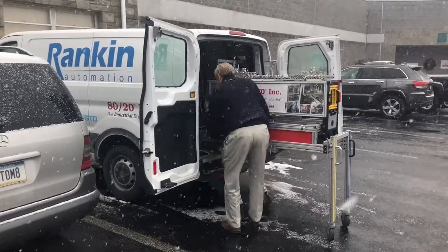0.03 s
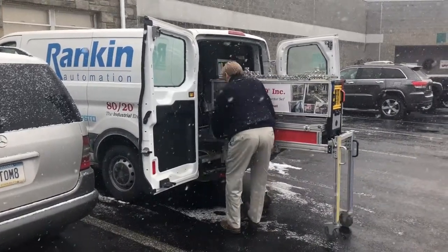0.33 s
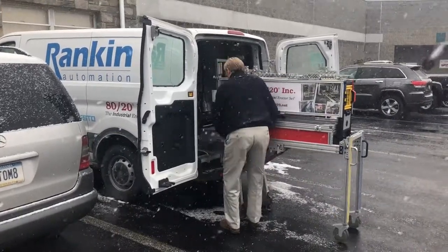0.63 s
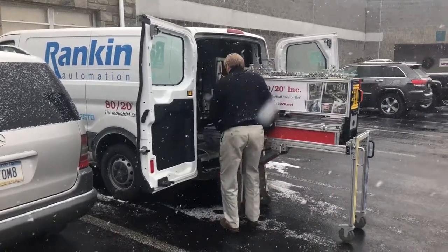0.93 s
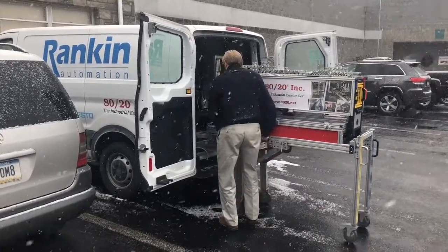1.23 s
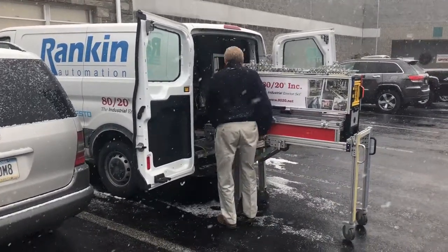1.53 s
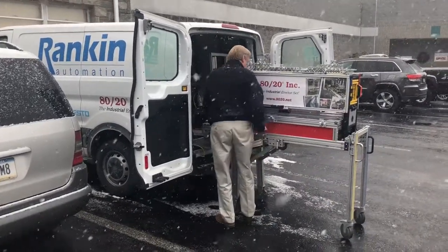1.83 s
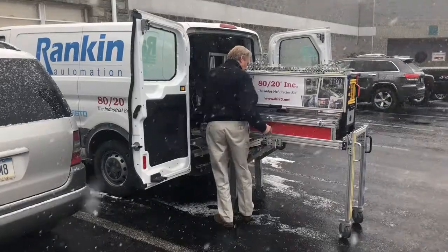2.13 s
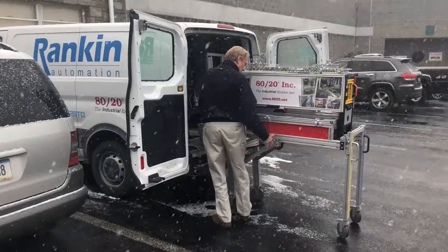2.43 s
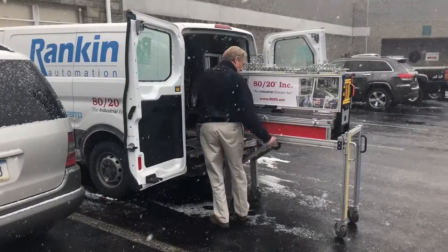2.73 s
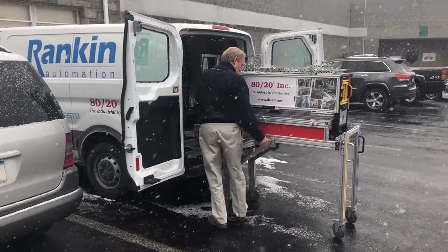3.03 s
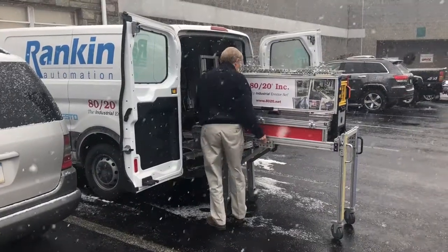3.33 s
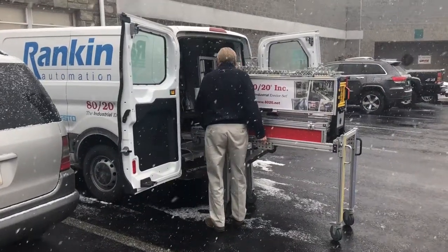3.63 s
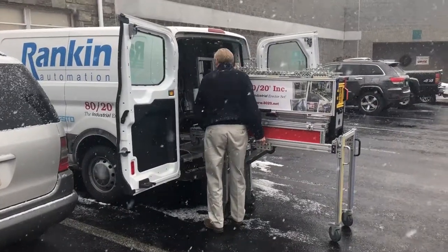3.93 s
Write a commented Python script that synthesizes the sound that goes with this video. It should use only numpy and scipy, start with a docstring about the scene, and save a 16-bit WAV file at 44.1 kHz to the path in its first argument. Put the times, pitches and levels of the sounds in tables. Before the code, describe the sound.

A metal cart slides out of a van, scraping with a hiss and a rising squeal from about 0.3 to 0.8 seconds, its wheels crackling faintly. The frame clanks and rattles near 1.2, 1.4 and 1.8 seconds, and a catch snaps shut around 2.5. Throughout, a nearby engine hums, settling to a lower idle by 2 seconds, with soft wind and distant traffic in the parking lot.

```python
"""A metal-frame cart is drawn out of a van in a parking lot. Sliding friction makes its runner hiss and
stick-slip makes it squeal; the wheels crackle faintly, impacts on the sill ring the modes of the frame,
and a catch snaps shut. Nearby an engine sounds harmonics of its cycle rate and settles to a lower idle.
Wind and distant traffic fill the lot with broadband noise, and a building wall faintly reflects the cart."""
import sys
import numpy as np
from scipy import signal
from scipy.fft import rfft, irfft, next_fast_len
from scipy.io import wavfile
from scipy.ndimage import map_coordinates

SR = 44100
rng = np.random.default_rng(int(sys.argv[2]) if len(sys.argv) > 2 else 0)


def transcribe(signal):
    """Save signal, clipped to [-1, 1], as a 16-bit WAV file at the path in sys.argv[1]."""
    frames = np.atleast_2d(signal).T
    limited = np.clip(frames, -1, 1)
    pcm = np.round(limited * 32767).astype(np.int16)
    wavfile.write(sys.argv[1], SR, pcm)


N = 176400

# wind and traffic: spectrum (frequency [Hz], relative level [dB])
LOT_SPECTRUM = [(180, -12), (300, -2), (411, -6), (553, -6), (663, -6), (849, -8), (1140, -10.5),
                (3020, -28), (5500, -35), (9000, -44.5), (15500, -47)]
# wind and traffic: envelope (time [s], level [dB])
LOT_ENVELOPE = [(0.0, -53), (0.14, -57.5), (2.77, -54), (4.0, -56)]
# low drone: envelope (time [s], level [dB])
DRONE_ENVELOPE = [(0, -88), (1.7, -58.5), (2.5, -68), (3.2, -51.5), (4, -53.5)]
# engine speed (time [s], cycle rate [Hz])
ENGINE_SPEED = [(0, 14.93), (.7, 14.87), (1.2, 14.65), (1.7, 13.75), (2.1, 13.3), (3, 13.1), (4, 12.93)]
# exhaust harmonics at fast idle (order [multiple of cycle rate], relative level [dB])
FAST_IDLE_ORDERS = [(1, -44), (3, -22), (4, -25), (5, -11.5), (6, -9), (7, -0.5), (8, 2), (10, -32),
                    (11, -15.5), (13, -4), (14, -21.5), (15, -21), (16, -16.5)]
# exhaust harmonics at slow idle (order [multiple of cycle rate], relative level [dB])
SLOW_IDLE_ORDERS = [(3, -33), (4, -13.5), (5, -6.5), (6, -36), (7, 2), (8, 1.5), (9, -13.5), (10, -16.5),
                    (12, -11), (13, -15), (14, -6), (15, -21), (16, -1), (17, -17), (18, -24), (19, -34),
                    (21, -18.5), (24, -18.5)]
# engine rumble: spectrum (frequency [Hz], relative level [dB])
RUMBLE_SPECTRUM = [(20, -36), (40, -31), (62, 8), (100, 8), (135, 5), (170, 10.5), (225, 7.5), (280, -11.5),
                   (400, -44), (800, -49)]
# reverberation of van and building (frequency [Hz], T60 [s])
REVERB_T60 = [(200, 0.57), (2000, 0.51), (10000, 0.16)]
# rolling wheels: envelope (time [s], level [dB])
ROLL_ENVELOPE = [(0, -58), (.2, -60), (.8, -60.5), (1.1, -64.5), (1.4, -62.5), (2.1, -69.5), (2.8, -90)]
# rolling wheels: spectrum (frequency [Hz], relative level [dB])
ROLL_SPECTRUM = [(500, 10), (1600, 6), (3000, -4.5), (5500, -5.5), (9000, -16), (15500, -13)]
# rubs on the van floor (peak time [s], level [dB], half length [s], centre [Hz], width [octaves])
FLOOR_SCUFFS = [(0.013, -60.5, 0.016, 2500, 1.5), (0.099, -54, 0.012, 2500, 1.25),
                (0.184, -51.5, 0.013, 1410, 1.58), (0.491, -46.5, 0.011, 1570, 0.97),
                (0.486, -48.5, 0.0081, 3800, 0.13), (0.562, -50, 0.0057, 1710, 1.5),
                (1.543, -62, .014, 1940, 0.14), (1.767, -64, 0.034, 1950, 0.24),
                (2.607, -61.5, 0.047, 1500, 1.1), (3.903, -70, 0.017, 4870, 0.88)]
# squeaks of the chattering runner (peak time [s], level [dB], half length [s], pitch [Hz])
RUNNER_SQUEAKS = [(0.519, -58.5, 0.0068, 2200), (.52, -64, .008, 7740), (0.56, -55.5, 0.0052, 1880),
                  (0.541, -61, 0.0093, 4200), (.59, -64, 0.012, 4020), (.61, -59, .008, 5950),
                  (.612, -58, 0.0082, 7660), (.635, -68, 0.0067, 2400), (0.667, -58, 0.013, 10600)]
# clicks of fittings and catch (time [s], level [dB], centre [Hz], width [octaves], T60 [s])
FITTING_CLICKS = [(0.2378, -47, 6000, 3.2, 0.056), (0.556, -53, 8200, .07, 0.05),
                  (.703, -55, 14000, .2, 0.024), (.872, -63.5, 2500, 1.8, 0.049),
                  (.989, -65.5, 5930, 1.8, 0.15), (1.042, -62, 2980, 1.3, 0.067),
                  (1.063, -47, 790, 0.65, 0.065), (1.064, -59, 5500, 0.29, 0.037),
                  (1.226, -47, 3770, 0.34, 0.016), (1.304, -61, 4970, 1.1, 0.1),
                  (1.369, -62.5, 6000, 1.27, 0.03), (1.556, -55.5, 8300, 1.4, 0.057),
                  (1.658, -61, 7040, 2.9, 0.033), (1.862, -64, 7950, 1.3, 0.06),
                  (1.96, -61, 3860, 0.66, .06), (2.069, -64.5, 12500, 0.25, .04),
                  (2.5364, -38, 8000, 1.6, 0.0073), (2.538, -49, 4000, 0.85, 0.051),
                  (2.5403, -39, 380, 1.1, 0.089), (2.5413, -33, 1940, 0.27, 0.026),
                  (2.575, -52.5, 3500, 0.46, 0.036), (2.636, -57, 10000, 0.97, 0.072),
                  (2.6618, -47, 4400, 0.53, 0.041), (2.667, -46.5, 2060, 0.28, 0.034),
                  (2.9997, -58.5, 4900, 0.58, 0.026)]
# sliding runner: envelope (time [s], level [dB])
SLIDE_ENVELOPE = [(.225, -92), (.25, -63), (.32, -60), (.375, -54.5), (.41, -65), (.45, -64), (.48, -54),
                  (.56, -58.5), (.63, -54.5), (.68, -69), (.75, -64), (.82, -96), (.9, -110)]
# friction hiss: spectrum (frequency [Hz], relative level [dB])
HISS_SPECTRUM = [(600, -24), (1900, -4), (2800, -3), (4500, -0.5), (6500, 0), (8500, 3), (11000, 2),
                 (12700, 4), (14500, -6), (15800, 2)]
# resonances of the runner (frequency [Hz], bandwidth [Hz], relative level [dB])
RUNNER_MODES = [(5304, 42, 16), (7000, 60, 1), (7530, 70, 13), (7940, 60, 1), (8880, 130, 9), (9300, 70, 6),
                (10020, 120, 7), (10600, 110, 5), (12600, 200, 10), (14200, 130, 12)]
# stick-slip oscillation (time [s], pitch [Hz], level [dB], roughness [0-1])
SQUEAL_PATH = [(.36, 1055, -69, 0.56), (.405, 1080, -54, 0.06), (.43, 1080, -56.5, 0),
               (.455, 1078, -57, 0.06), (.475, 1037, -69, 1), (.51, 1090, -76, 0.7), (.53, 1335, -62, 0.8),
               (.59, 1328, -70, 0.66), (.602, 1503, -73, 0.44), (.617, 1520, -62, 0.37),
               (.635, 1450, -69, 0.94), (.655, 1509, -56, 0.15), (.668, 1510, -58, 0.19),
               (.68, 1464, -55.5, 0), (.718, 1454, -57.5, .2), (.735, 1480, -59.5, 0.4),
               (.747, 1535, -53.5, 0.54), (.752, 1550, -72, .9), (.76, 1824, -53, 0.25),
               (.78, 1840, -69, 0.1), (.81, 1860, -87, .47)]
# weighting of the squeal's harmonics (frequency [Hz], relative level [dB])
SQUEAL_SPECTRUM = [(1000, -12), (2150, -0.5), (2900, 1), (3300, -17), (4300, -5), (5350, 1), (5900, -5),
                   (6500, -1), (7550, 5), (8600, -0.5), (9000, 4.5), (9700, -7), (10700, -7), (11700, -6),
                   (14000, -6), (15500, -19)]
# modes of the frame (frequency [Hz], relative level [dB], T60 [s])
FRAME_MODES = [(1227, -10, .13), (1425, -11, .18), (1606, -10, .13), (1680, -5.5, .125), (1965, -5.5, .105),
               (2070, -1.5, .08), (2422, -10, .09), (2985, -7, .105), (3240, -13.5, .08), (4000, -16, .08),
               (4920, -15, .08), (6150, -15, .09), (7300, -14, .07), (8845, -17, .045), (11170, -16, .05)]
# impacts on the sill
# (time [s], ring level [dB], clatter level [dB], main mode [Hz], its lift [dB], rebound gain [dB])
SILL_IMPACTS = [(1.173, -46, -39.5, 2070, 5, -3), (1.204, -48, -44, 1680, 5, -4),
                (1.2244, -43, -34, 1227, 16.5, -17), (1.239, -66, -50, 1227, 3, -10),
                (1.2493, -67, -45.5, 1227, 4, -18), (1.4426, -38.5, -36, 1654, 4.5, -2.5),
                (1.7908, -40, -38.5, 2950, 0.5, -10), (1.805, -46.5, -63, 2985, 2.5, -2)]
# clatter: initial spectrum (frequency [Hz], relative level [dB])
CLATTER_SPECTRUM = [(150, -33), (400, 0), (700, 0), (1200, 2), (2000, 4.5), (2800, -6.5), (5000, -7),
                    (8000, -15), (12000, -14.5), (15500, -18)]
# clatter: decay (frequency [Hz], T60 [s])
CLATTER_DECAY = [(400, 0.13), (2000, 0.079), (5000, 0.085), (14000, 0.064)]

TOP_HZ = 15950


def amp(db):
    """Amplitude ratio of a level in decibels."""
    return 10 ** (np.asarray(db) / 20)


def unit(x):
    """Normalisation to rms 1."""
    return x / np.sqrt(np.mean(x ** 2) + 1e-20)


def along(points, hz):
    """Interpolation of (frequency, value) points on a logarithmic frequency axis."""
    freqs, values = np.transpose(points)
    return np.interp(np.log(hz + 1), np.log(freqs + 1), values)


def curves(rows):
    """Linear interpolation in time: one curve for each column after the first."""
    times, *columns = np.transpose(rows)
    return [np.interp(np.arange(N) / SR, times, column) for column in columns]


def wobble(rate, size=N):
    """Smooth random modulation: a spline through rate Gaussian values a second."""
    return map_coordinates(rng.standard_normal(size // 16), [np.arange(size) * rate / SR], mode="mirror")


def filtered(x, response):
    """Linear filtering: the spectrum of x times a frequency response."""
    padded = next_fast_len(len(x) + 8192)
    return irfft(rfft(x, padded) * response(np.fft.rfftfreq(padded, 1 / SR)), padded)[:len(x)]


def noise(spectrum, size=N):
    """Spectral shaping of white noise, at rms 1."""
    return unit(filtered(rng.standard_normal(size), lambda hz: amp(along(spectrum, hz))))


def band(centre_hz, octaves, size=N):
    """Band-pass noise of rms 1, Gaussian in log frequency."""
    bell = lambda hz: np.exp(-.5 * (np.log2((hz + 1) / centre_hz) / octaves) ** 2)
    return unit(filtered(rng.standard_normal(size), bell))


def damped(x, t60s):
    """Frequency-dependent damping: each band of x decays at its own rate."""
    hz, t, spectra = signal.stft(x, SR, nperseg=128)
    decay = amp(-60 * t / along(t60s, hz)[:, None])
    return signal.istft(spectra * decay, SR, nperseg=128)[1][:len(x)]


def patchy(x, patch_hz=260, patch_s=.05, depth_db=4.2):
    """Random modulation in time and frequency: narrow bands of x flare and fade."""
    spectra = signal.stft(x, SR, nperseg=1024)[2]
    steps = np.array([SR / 1024 / patch_hz, 512 / SR / patch_s])
    knots = np.indices(spectra.shape) * steps[:, None, None]
    field = map_coordinates(rng.standard_normal(spectra.shape), knots, mode="mirror")
    return unit(signal.istft(spectra * amp(depth_db * field), SR, nperseg=1024)[1][:N])


def fade(t, t60):
    """Exponential decay, 60 dB in t60 seconds."""
    return np.exp(-np.log(1000) * t / t60)


def swell(peak_s, half_s):
    """Gaussian envelope with standard deviation half_s."""
    return np.exp(-.5 * ((np.arange(N) / SR - peak_s) / half_s) ** 2)


def add(out, start_s, x):
    """Superposition of x on out from start_s."""
    part = out[max(round(start_s * SR), 0):][:len(x)]
    part += x[:len(part)]


def wind_and_traffic():
    """Broadband ambient noise, strongest at low frequencies, with a slight waver."""
    db, = curves(LOT_ENVELOPE)
    return amp(db + .5 + .4 * wobble(9)) * noise(LOT_SPECTRUM)


def drone():
    """Band-limited noise: a low rush that comes up with the slower idle."""
    db, = curves(DRONE_ENVELOPE)
    return amp(db) * band(centre_hz=197, octaves=.37)


def engine(fast_db=-43.5, slow_db=-47, rumble_db=-48, waver_db=1.2):
    """Periodic exhaust gives harmonics of one shaft speed, over a rumble; their balance follows the speed."""
    speed, = curves(ENGINE_SPEED)
    phase = 2 * np.pi * np.cumsum(speed) / SR
    fast = np.interp(speed, [13.3, 14.65], [0, 1])  # share of the fast idle
    idles = [(FAST_IDLE_ORDERS, fast_db, fast), (SLOW_IDLE_ORDERS, slow_db, 1 - fast)]
    exhaust = np.zeros(N)
    for k in range(1, 25):
        power = .5 if k < 9 else 2  # upper orders dip between the two idles
        gain = sum(share ** power * amp(db + level)
                   for orders, db, share in idles for order, level in orders if round(order) == k)
        gain = gain / (np.sqrt(fast) + np.sqrt(1 - fast))
        waver = amp(waver_db * wobble(6.14))
        exhaust += np.sqrt(2) * gain * waver * np.sin(k * phase + 2 * np.pi * rng.random())
    return exhaust + amp(rumble_db) * noise(RUMBLE_SPECTRUM)


def reflections(x, reverb_s=.03, reverb_db=-18, echo_s=.076, echo_db=-29, echo_cutoff_hz=2500):
    """Reflection: diffuse reverberation from van and building, and one dull echo off the wall."""
    tail = damped(rng.standard_normal(SR // 2), REVERB_T60)
    reverb = signal.fftconvolve(x, tail / np.linalg.norm(tail))
    echo = filtered(x, lambda hz: 1 / (1 + (hz / echo_cutoff_hz) ** 4))
    out = np.zeros(N)
    add(out, reverb_s, amp(reverb_db) * reverb)
    add(out, echo_s, amp(echo_db) * echo)
    return out


def wheels():
    """Rolling noise: random amplitude modulation makes a faint, uneven crackle."""
    db, = curves(ROLL_ENVELOPE)
    return amp(db + 3.7 * wobble(30.47) + 1.2 * wobble(400)) * noise(ROLL_SPECTRUM)


def scuffs(grain_db=.5):
    """Friction of the frame on the van floor gives short swells of grainy noise."""
    return sum(amp(db + grain_db * wobble(500)) * swell(s, half) * band(hz, octaves)
               for s, db, half, hz, octaves in FLOOR_SCUFFS)


def squeaks():
    """Friction chatter of the runner gives bursts of noise narrow enough to have pitch."""
    return sum(amp(db) * swell(s, half) * band(hz, octaves=.012) for s, db, half, hz in RUNNER_SQUEAKS)


def clicks(attack_s=.0001):
    """Impact transients, as damped noise bands: loose fittings tick, the catch snaps and settles."""
    out, t = np.zeros(N), np.arange(SR // 5) / SR
    attack = 1 - np.exp(-t / attack_s)
    for s, db, hz, octaves, t60 in FITTING_CLICKS:
        add(out, s, amp(db) * band(hz, octaves, size=len(t)) * fade(t, t60) * attack)
    return out


def runner_hiss(ring_db=-.5, drift=.007, grain_db=1.4):
    """Sliding friction makes a grainy hiss and drives the runner's narrow resonances."""
    db, = curves(SLIDE_ENVELOPE)
    resonances = lambda f: sum(amp(level) * 1j * f * width / (hz * hz - f * f + 1j * f * width)
                               for hz, width, level in RUNNER_MODES)
    ring = filtered(rng.standard_normal(N), resonances)
    warped_time = np.cumsum(1 + drift * wobble(35))  # the resonances waver in pitch
    ring = unit(map_coordinates(ring, [warped_time], order=5, mode="mirror"))
    envelope = amp(db + grain_db * wobble(89.9))
    return envelope * (patchy(noise(HISS_SPECTRUM)) + amp(ring_db) * ring)


def runner_squeal(jitter=.0199, flutter=.004, smear_rad=3.2, flicker_db=2.7):
    """Stick-slip oscillation of the runner; twice it grows nearly periodic and gives a clean pitch."""
    hz, db, rough = curves(SQUEAL_PATH)
    pitch = hz * (1 + jitter * rough * wobble(90) + flutter * wobble(500))
    phase = 2 * np.pi * np.cumsum(pitch) / SR
    tone = np.zeros(N)
    for k in range(1, 15):
        gain = amp(along(SQUEAL_SPECTRUM, k * hz) + flicker_db * wobble(50.5)) * (k * hz < TOP_HZ)
        tone += gain * np.sin(k * phase + smear_rad * rough * wobble(220))
    t = np.arange(N) / SR
    sounding = (t > SQUEAL_PATH[0][0]) & (t < SQUEAL_PATH[-1][0])
    return amp(db) * unit(tone) * sounding


def frame_ring(t, main_hz, lift_db, rattle_rad=.52):
    """Free vibration of the tubes: damped modes, phase-modulated by loose joints."""
    ring = np.zeros(len(t))
    for hz, db, t60 in FRAME_MODES:
        is_main = abs(np.log(hz / main_hz)) < .04
        gain = amp(db + rng.normal(0, 1.8) + lift_db * is_main)
        phase = 2 * np.pi * (hz * t + rng.random()) + rattle_rad * wobble(150, size=len(t))
        ring += gain * fade(t, t60) * np.sin(phase)
    return ring


def frame_clanks(rebound_s=.0068, attack_s=.0015, thud_hz=109, thud_over_ring_db=5):
    """Impact excitation: the frame hits the sill and rebounds, ringing and clattering; the floor thuds."""
    out, t = np.zeros(N), np.arange(SR // 2) / SR
    attack = 1 - np.exp(-t / attack_s)
    thud = fade(t, t60=.019) * np.sin(2 * np.pi * thud_hz * t)
    for s, ring_db, clatter_db, main_hz, lift_db, rebound_db in SILL_IMPACTS:
        add(out, s, amp(ring_db + thud_over_ring_db) * thud)
        for delay, contact_db in (0, 0), (rebound_s, rebound_db):
            ring = amp(ring_db) * frame_ring(t, main_hz, lift_db)
            clatter = amp(clatter_db) * damped(noise(CLATTER_SPECTRUM, size=len(t)), CLATTER_DECAY)
            add(out, s + delay, amp(contact_db) * attack * (ring + clatter))
    return out


def scene():
    """Superposition of the cart, its reflections and the parking lot, in one channel."""
    cart = runner_hiss() + wheels() + runner_squeal() + frame_clanks() + clicks() + scuffs() + squeaks()
    return (cart + reflections(cart) + engine() + drone() + wind_and_traffic())[None]


def record(dry):
    """Band limiting: an ideal low-pass filter removes everything above TOP_HZ."""
    return np.array([filtered(x, lambda hz: hz < TOP_HZ) for x in dry])


dry = scene()
out = record(dry)
transcribe(out)
```